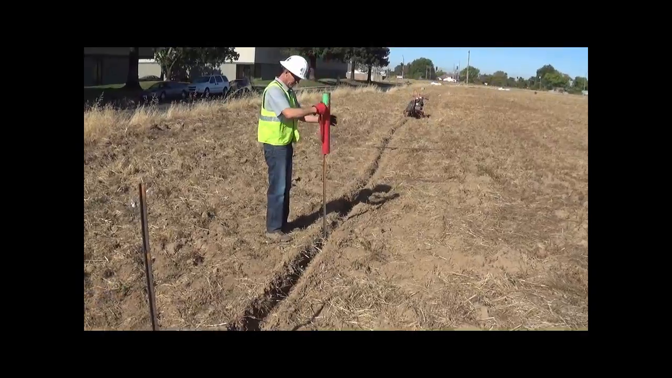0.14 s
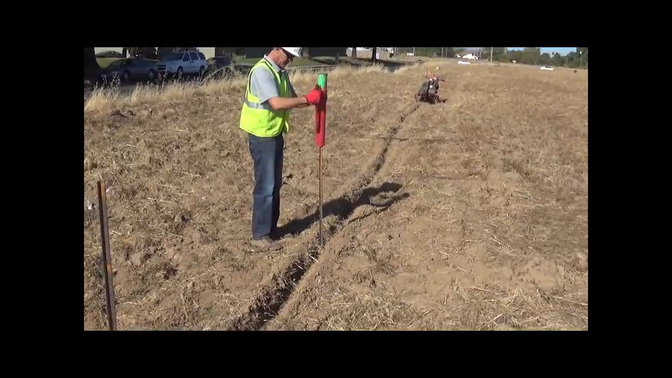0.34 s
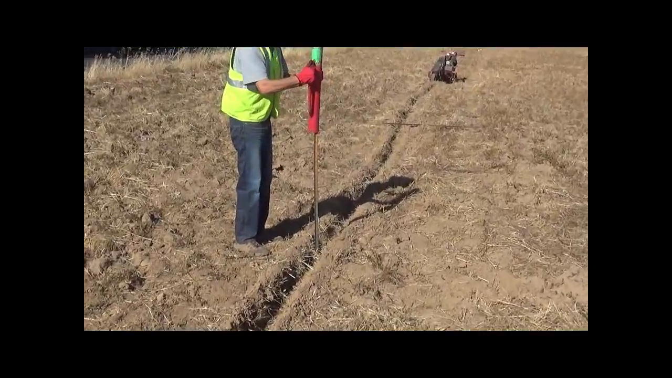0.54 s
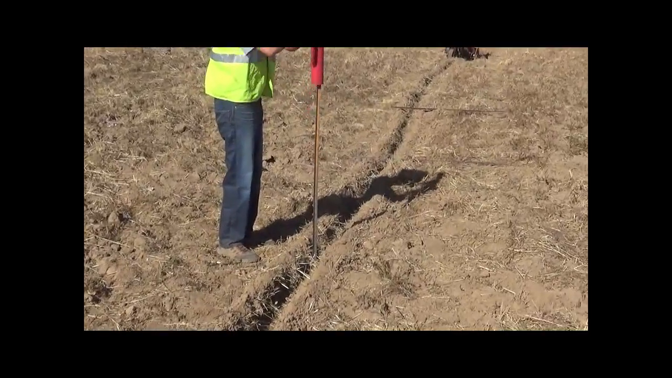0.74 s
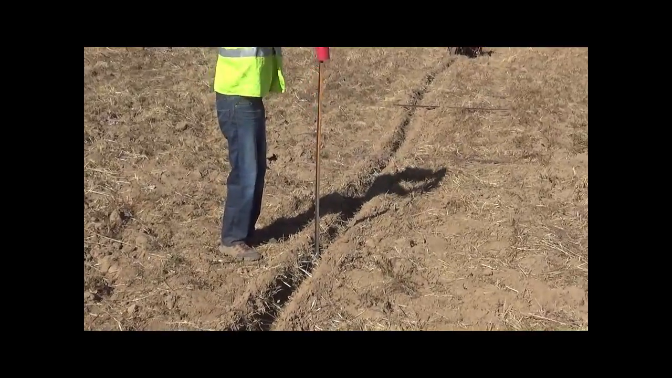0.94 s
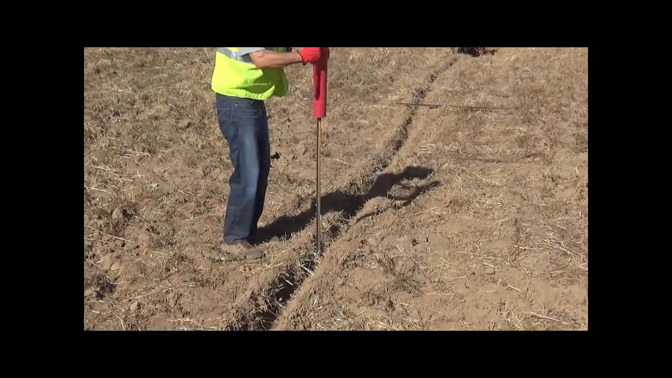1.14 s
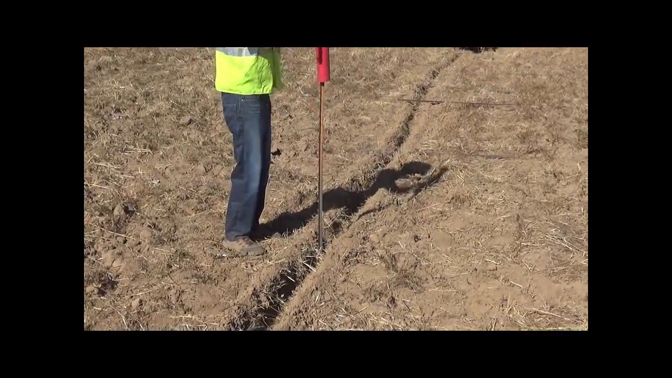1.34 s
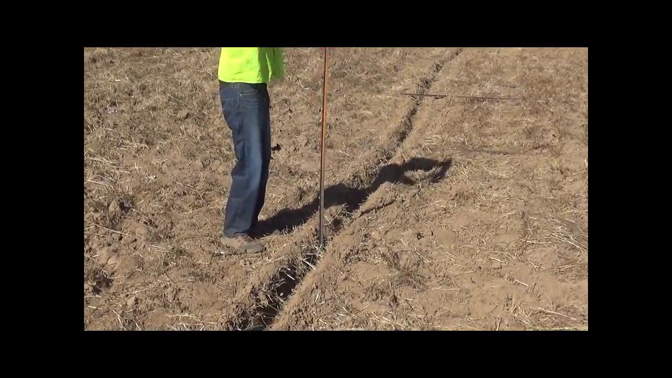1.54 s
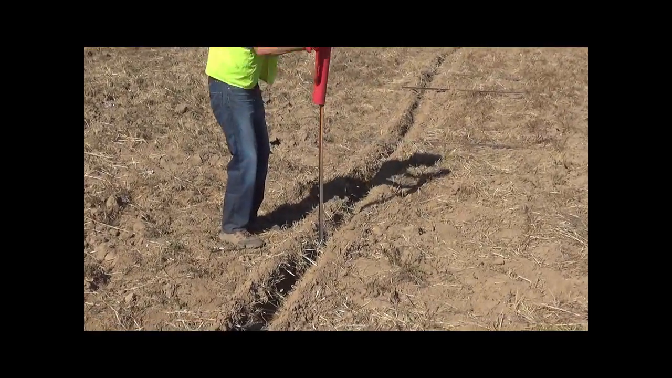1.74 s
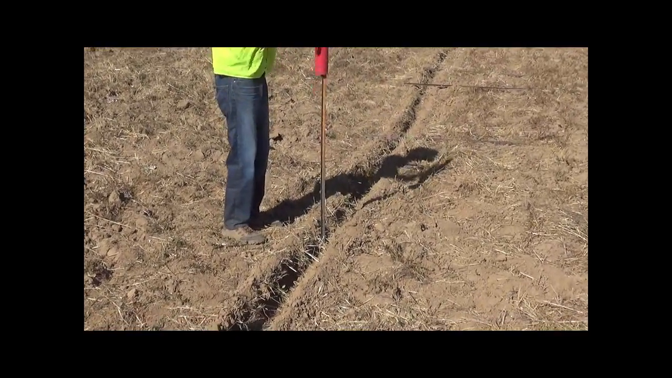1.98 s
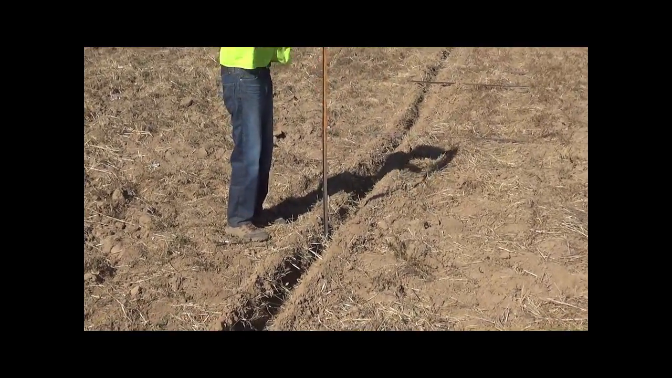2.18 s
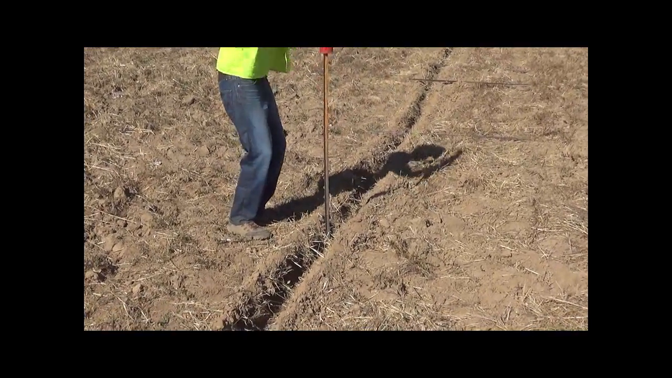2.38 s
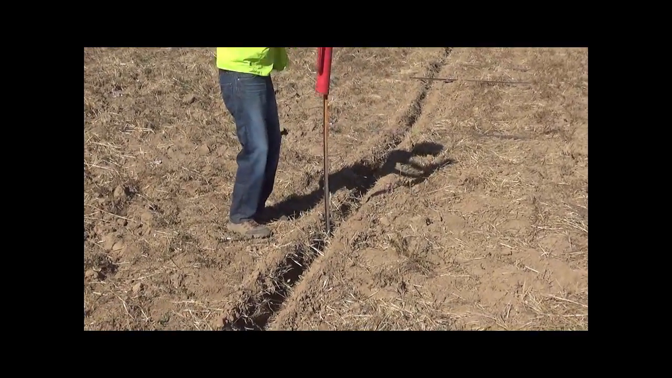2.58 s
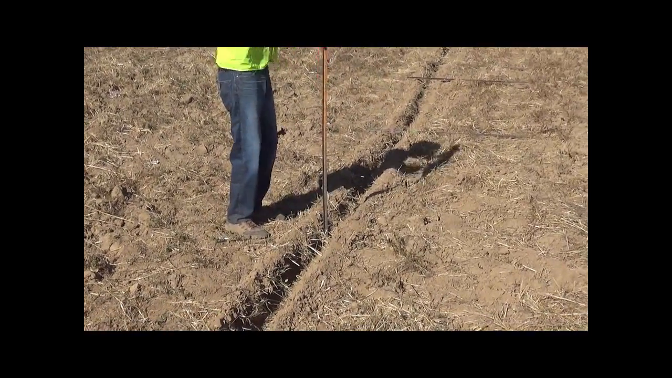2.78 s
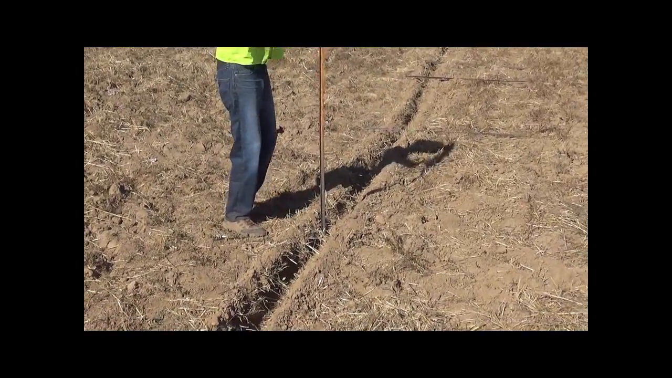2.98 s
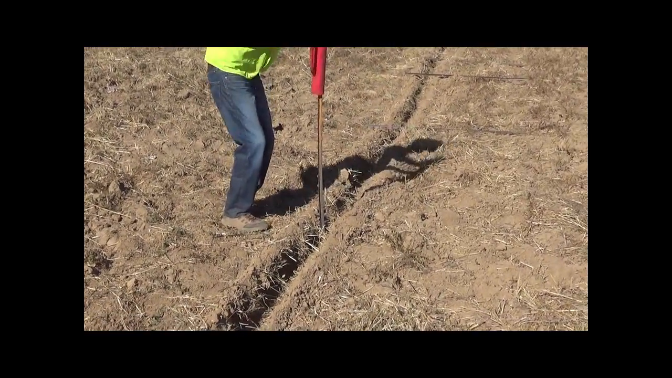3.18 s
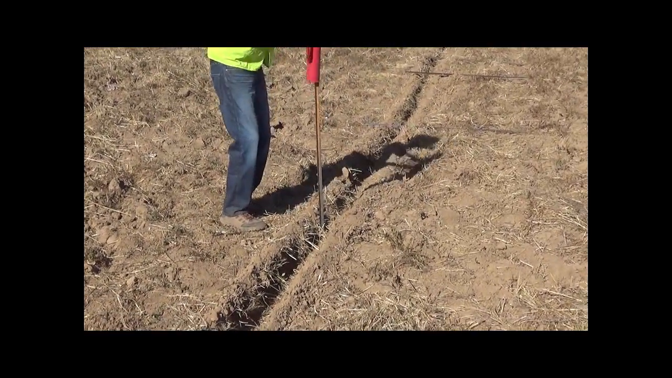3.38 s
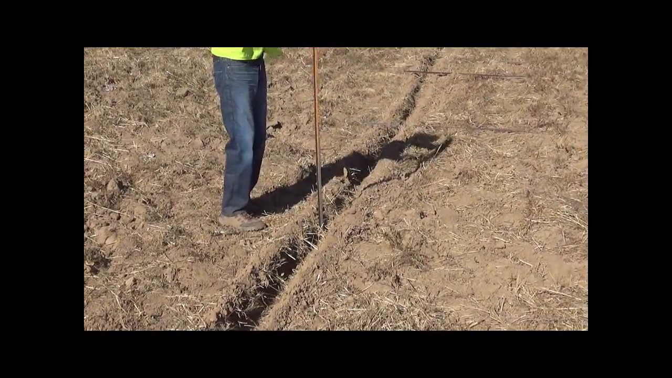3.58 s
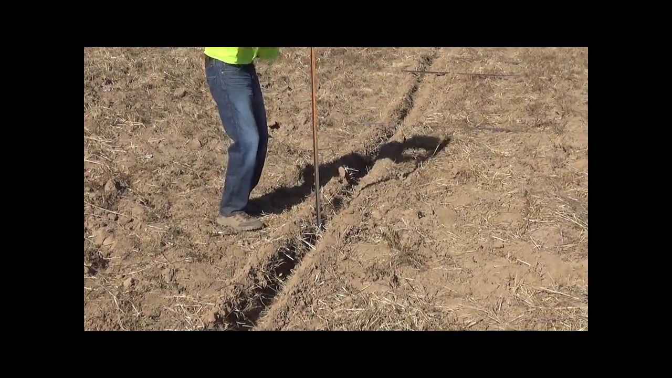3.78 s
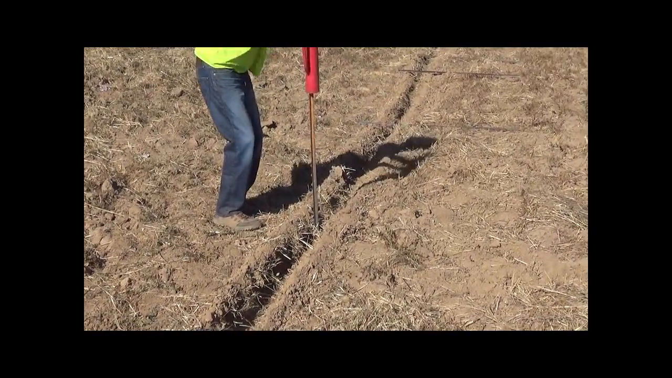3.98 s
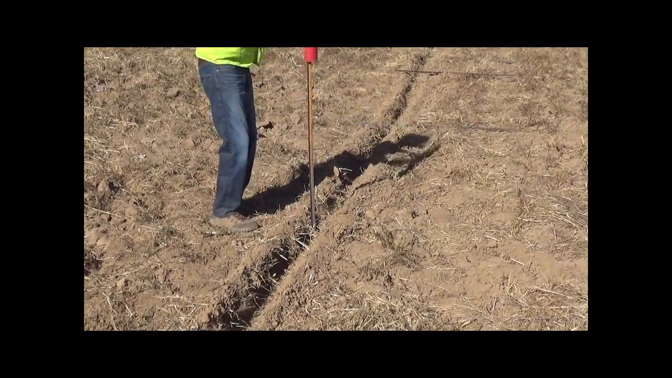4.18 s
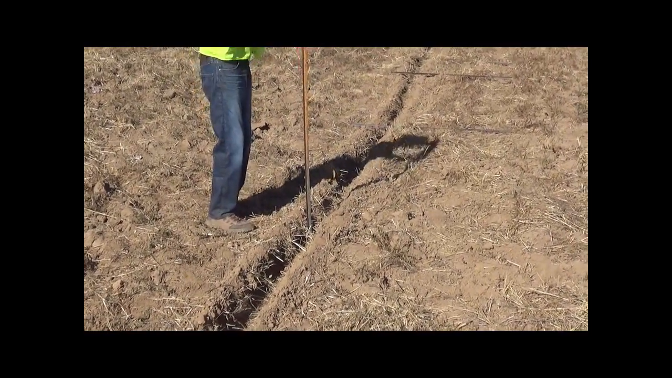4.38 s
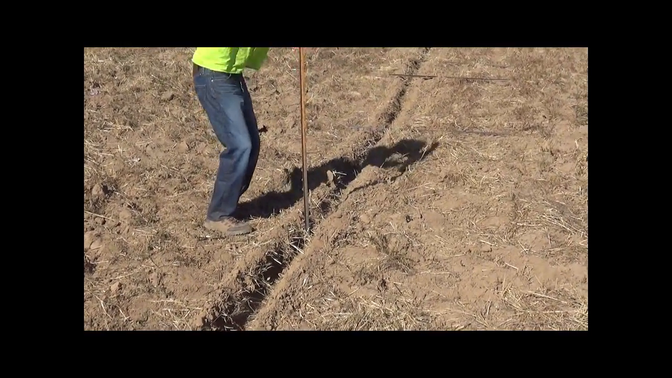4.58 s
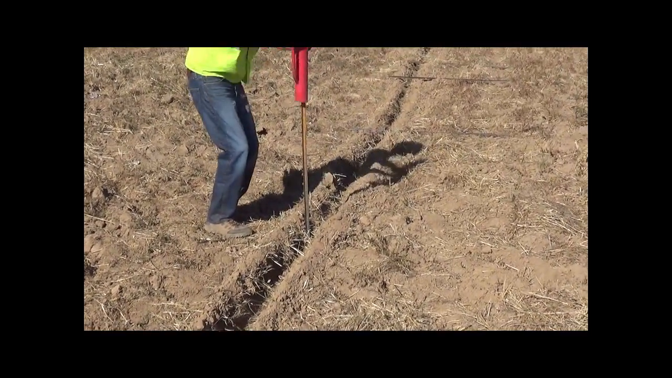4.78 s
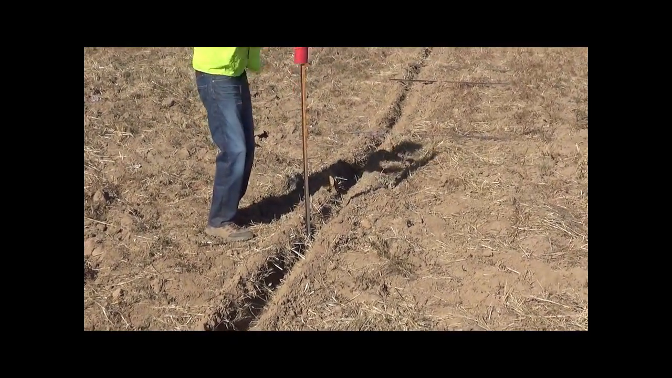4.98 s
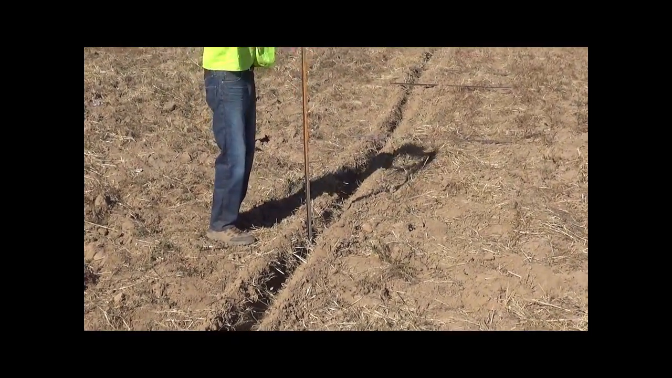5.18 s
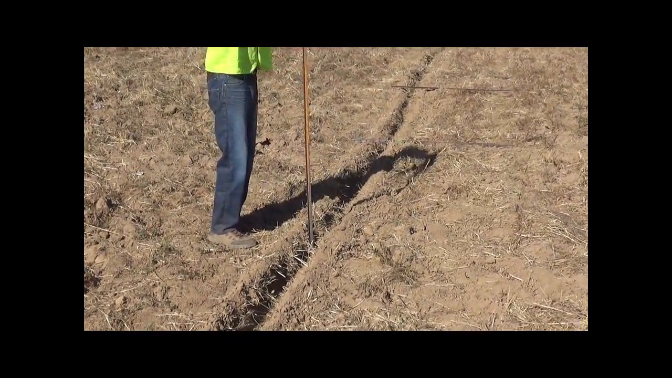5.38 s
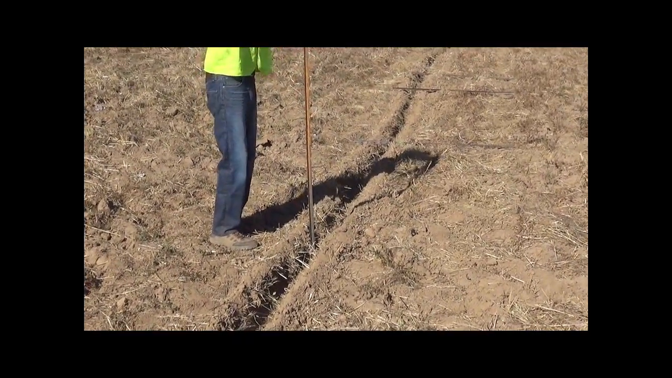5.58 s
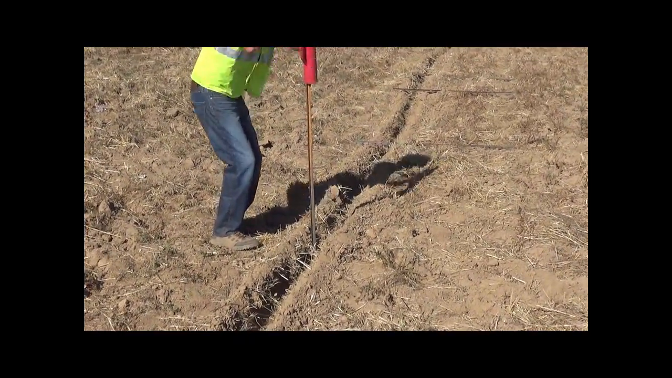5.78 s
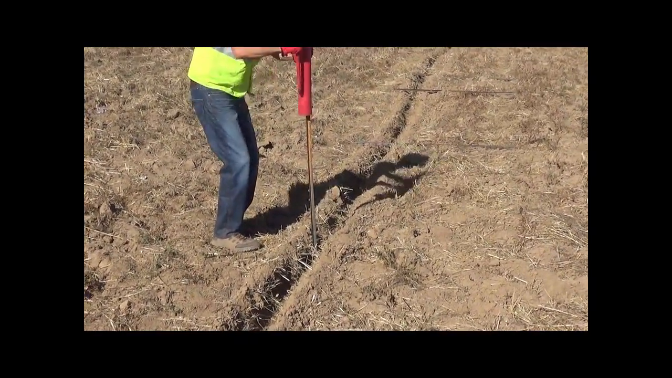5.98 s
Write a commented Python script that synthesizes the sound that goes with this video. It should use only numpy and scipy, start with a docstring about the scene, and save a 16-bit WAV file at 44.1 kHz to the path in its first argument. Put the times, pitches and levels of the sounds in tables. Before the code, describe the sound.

A steel post is driven into dry ground with a heavy capped tube, heard from a few metres away outdoors. At 0 seconds loose steel clanks and rings with the first blow, followed by scattered knocks and a dry tick near 0.5. The loudest blow lands at about 1.2, with a dense jangling chatter until 1.5. Further blows fall at about 1.8, 2.5, 3.3, 4.0 and 4.8, then, after a quieter gap, at 5.9. Each is a hard, bright, gritty clang with a hollow low boom and a ring gone within a few tenths of a second; the tube wall catches the post just before and rattles after. Low wind buffets the microphone until about 1.8, then mostly fades. Tiny falling chirps come near 1.1, 2.2 and 2.9. Faint traffic wash and a wavering low engine drone, slightly stronger around 5, lie underneath, with a faint open-air echo.

```python
"""A tube driver slams its cap onto a steel post in dry ground: eight blows, most of them about 0.7 s apart.
Each blow rings post, tube and trapped air as decaying modes; between blows the tube wall clanks on the post.
A faint diffuse tail follows the steel, with a few ticks and falling chirps.
Banded noise makes the wind, which buffets the microphone and mostly dies down, and the far traffic under a
wavering engine drone. The recorder's limiter ducks under the loud clanks."""
import sys
import numpy as np
from scipy import signal
from scipy.io import wavfile
from scipy.ndimage import uniform_filter1d, minimum_filter1d

SR = 44100
rng = np.random.default_rng(int(sys.argv[2]) if len(sys.argv) > 2 else 0)


def generate_wav(signal):
    """Clip the signal to [-1, 1] and save it as 16-bit WAV at the path in sys.argv[1]."""
    frames = np.transpose(np.atleast_2d(signal))
    scaled = np.clip(frames, -1, 1) * 32767
    pcm = np.round(scaled).astype(np.int16)
    wavfile.write(sys.argv[1], SR, pcm)


N = 265923
TIME = np.arange(N) / SR


def from_db(db):
    """Decibels to amplitude factor."""
    return 10 ** (np.asarray(db) / 20)


def rms_one(x):
    """Scale to an rms of 1."""
    return x / np.sqrt(np.mean(x ** 2) + 1e-20)


def in_time(rows):
    """Straight lines between (start_s, value) points, at every sample."""
    return np.interp(TIME, *np.transpose(rows))


def at_hz(points, hz):
    """Read a curve of (pitch_hz, value) points along a logarithmic pitch axis."""
    points = np.array(points)
    return np.interp(np.log(hz), np.log(points[:, 0]), points[:, 1])


def drift(rate_hz):
    """Random wandering of rms 1, smoothed by two equal poles at rate_hz."""
    step = 40   # samples between the points that are drawn
    pole = np.exp(-2 * np.pi * rate_hz * step / SR)
    chance = rng.standard_normal(N // step + 2002)
    slow = signal.lfilter([1], [1, -2 * pole, pole * pole], chance)[2000:]   # skip the run-in
    return np.interp(np.arange(N) / step, np.arange(len(slow)), rms_one(slow))


def banded_noise(spectrum, likeness, patchy_db, count):
    """Half-octave bands of stereo noise, each with its own level, flicker and left-right likeness; rms 1."""
    out = 0
    edges = 22 * 2 ** (np.arange(count + 1) / 2)
    white = rng.standard_normal((2, 2, N))
    for k, (low, high) in enumerate(zip(edges, edges[1:])):
        band = signal.butter(2, [low, high], "band", fs=SR, output="sos")
        mid, side = signal.sosfilt(band, white[k % 2])   # neighbouring bands use separate noise
        hz = np.sqrt(low * high)
        alike = np.clip(at_hz(likeness, hz), -1, 1)
        gain = from_db(at_hz(spectrum, hz) + patchy_db * drift(9.9))
        stereo = np.sqrt(1 + alike) * mid + np.sqrt(1 - alike) * side * [[1], [-1]]
        out = out + gain * stereo
    return rms_one(out)


# nominal decay of the steel's weaker modes, before each strike's damping: pitch_hz [Hz], t60_s [s]
STEEL_DECAY = [(700, 0.13), (2000, 0.14), (4000, 0.22), (6000, 0.29), (10000, 0.35), (15500, 0.29)]


def dense_modes(spectrum, count):
    """Closely, unevenly spaced modes of uneven strength under a spectrum: rows pitch_hz, level_db, t60_s."""
    spacing_hz = 15200 / count
    hz = 600 + spacing_hz * (np.arange(count) + rng.random(count))
    t60 = at_hz(STEEL_DECAY, hz) * from_db(0.14 * rng.standard_normal(count))
    # every four neighbours hold two weak modes, one middling and one strong
    fours = rng.permuted(np.tile([-1, -1, 0, 1], (count // 4, 1)), axis=1)
    uneven_db = 7 * (fours.ravel() - 0.3)
    level_db = at_hz(spectrum, hz) + 10 * np.log10(spacing_hz / 100) + uneven_db
    return np.column_stack([hz, level_db, t60])


HOOP_HZ, HOOP_WIDTH_OCTAVES = 1777, 0.23   # lowest hoop mode; width of the boost around each one


def contact_colour(hz, tilt, hoop_db):
    """A hard contact tilts the ring to the treble; a square one favours hoop flexing in 2, 3 or 4 lobes: dB."""
    lobes = np.arange(2, 5)[:, None]
    ratios = lobes * (lobes ** 2 - 1) / np.sqrt(lobes ** 2 + 1)   # pitches of a flexing ring
    octaves_off = np.log2(hz / (HOOP_HZ * ratios / ratios[0]))
    nearness = np.exp(-0.5 * (octaves_off / HOOP_WIDTH_OCTAVES) ** 2).sum(axis=0)
    return tilt * np.log2(np.maximum(hz, 1500) / 4000) + hoop_db * nearness


# stereo balance of the ringing steel and air: pitch_hz [Hz], left_minus_right_db [dB]
RING_BALANCE = [(300, -1), (1400, 3), (2800, 1), (5000, 1.75), (10000, 0.3), (15000, -3)]


def strike(hits, modes, vary_db, spread_db, size, damping=1.0, swell_s=0.0024, favour_db=0):
    """Each contact falls on another spot and favours other modes, which ring for `size` samples."""
    hits, (hz, mode_db, t60) = np.array(hits), np.transpose(modes)
    chance = rng.standard_normal((len(hits), len(hz), 3))
    colour_db = contact_colour(hz, tilt=hits[:, 2:3], hoop_db=hits[:, 3:4]) + favour_db
    # modes with a node near the spot of contact stay quiet: a comb whose teeth move from hit to hit
    spot = rng.random((len(hits), 2))
    comb = np.cos(2 * np.pi * (hz * (0.7 + spot[:, :1]) / 1000 + spot[:, 1:]))
    chance_db = vary_db * (chance[..., 0] / 2 + 2 * comb - 1.5)
    height = np.sqrt(2) * from_db(hits[:, 1:2] + colour_db + mode_db + chance_db)
    phase = np.arctan2(chance[..., 1], chance[..., 2])
    weights = np.hstack([height * np.cos(phase), height * np.sin(phase)])
    t = TIME[:size].astype(np.float32)
    turn = np.outer(np.float32(2 * np.pi * hz), t)
    fade = np.exp(-np.minimum(np.outer(np.float32(damping * np.log(1000) / t60), t), 20))
    fade *= 1 - np.exp(-t / np.float32(swell_s))   # the ring builds up as the shock runs along the steel
    rings = np.vstack([fade * np.sin(turn), fade * np.cos(turn)])
    # every mode radiates in its own pattern and so leans a little to one side
    lean_db = at_hz(RING_BALANCE, hz) + spread_db * rng.standard_normal(len(hz))
    half_lean_db = np.tile(lean_db, 2) / 2   # once for the sines, once for the cosines
    out = np.zeros((2, N + size))
    for channel, sign in zip(out, (1, -1)):
        clanks = np.float32(weights * from_db(sign * half_lean_db)) @ rings
        for s, clank in zip(hits[:, 0], clanks):
            start = max(round(s * SR), 0)
            channel[start:start + size] += clank
    return out[:, :N]


def crash(hits, spectrum, t60, grit_db):
    """A gritty burst of shaped noise at each contact, its power decaying quickly."""
    kicks = np.zeros(N)
    for s, level_db, *_ in hits:
        kicks[max(round(s * SR), 0)] += from_db(level_db) ** 2
    decay = from_db(-60 / (t60 * SR)) ** 2
    power = signal.lfilter([1], [1, -decay], kicks + 1e-18)
    hz = np.linspace(0, SR / 2, 257)
    shape = signal.firwin2(511, hz, from_db(at_hz(spectrum, hz + 1)), fs=SR)
    hiss = signal.fftconvolve(rng.standard_normal(N), shape, "same")
    return np.sqrt(power) * rms_one(from_db(grit_db * drift(150)) * hiss)


def rattle(hits, count, delay_s, first_db):
    """After each contact the post whips about in the tube and touches it again at random moments."""
    rows = np.repeat(np.array(hits, float), count, axis=0)
    chance = rng.random((len(rows), 2))
    rows[:, 0] += delay_s * chance[:, 0]
    rows[:, 1] += first_db - 8 * chance[:, 1] - 5 * chance[:, 0]   # later touches tend to be weaker
    return rows


# the cap lands on the post: start_s [s], level_db [dB, relative], tilt [dB per octave], hoop_db [dB],
# lead_s [s by which the wall catches the post earlier], sing_hz [Hz that sings at this catch]
STROKES = [(0.07, -2, -2, 3, 0.042, 9383), (1.185, 7.5, 1.5, -2.5, 0.021, 4748),
           (1.839, -12, 1.5, -4.5, 0.0043, 10053), (2.549, -5, -.5, 0, .050, 1614),
           (3.292, -4, 1.6, -3, .012, 2767), (4.012, -8, -0.5, 3, 0.054, 1951),
           (4.78, -6, -2, -3.5, 0.057, 5030), (5.935, -7, 0.5, -3.5, 0.039, 1951)]
GRAZE_S, GRAZE_DB = 0.13, -41   # a light graze as the downswing begins: lead before the blow, relative level
CATCH_BELOW_DB, CATCH_TILT, CATCH_HOOP_DB = 5.5, 0.78, 5.5   # dB under the blow, dB per octave, dB


def downswings():
    """On its way down the tube grazes the post, then catches it and briefly chatters: rows like KNOCKS."""
    grazes = [(s - GRAZE_S, GRAZE_DB, 0, 0, hz) for s, *_, hz in STROKES]
    catches = [(s - lead_s, level_db - CATCH_BELOW_DB, CATCH_TILT, CATCH_HOOP_DB, hz)
               for s, level_db, _, _, lead_s, hz in STROKES]
    return np.vstack([grazes, catches, rattle(catches, count=2, delay_s=0.025, first_db=-3.0)])


# the tube wall knocks on the post as it rebounds and is lifted: start_s [s], level_db [dB, relative],
# tilt [dB per octave], hoop_db [dB], sing_hz [Hz that sings]
KNOCKS = [(0.0, 1.5, 2, 1, 1738), (0.156, -3.5, -1, 7, 3482), (0.224, -8, 5, 0, 1738),
          (0.408, -14, 4, -5.5, 10530), (0.632, -28, -2.5, 2, 4882), (0.736, -25.5, -1.5, 3, 4748),
          (0.849, -23, 1, 3, 1738), (0.862, -23.5, 4.5, 5.5, 4720), (0.935, -9, 0.5, -3, 1951),
          (1.241, 3, 0, 5, 4800), (1.289, -0.5, 3.5, 8, 1951), (1.319, 2.5, 3, 4.5, 4700),
          (1.338, -0.5, 0.5, 4, 9383), (1.444, -0.5, 3, -2, 2072), (1.526, -19, 0, 5, 2072),
          (1.567, -12, -0.5, -11.5, 1738), (1.893, -10.5, 2.5, 6.5, 1614), (1.945, -16, 2, 12.5, 1951),
          (1.966, -6.5, 2, 1.5, 4780), (2.041, -17.5, -0.5, -1, 4980), (2.318, -25.5, -4.5, -5, 4780),
          (2.612, -8, 2.5, 2, 4930), (2.689, -8, 0, 1.5, 4808), (2.75, -25, -5.5, 6, 1738),
          (2.934, -26, -6.5, 0, 2326), (3.055, -23.5, -0.5, 0.5, 2767), (3.345, -13, 0, 8, 4760),
          (3.366, -8.5, -2, -10, 1738), (3.391, -6, 1.5, 6, 4686), (3.439, -8, -0.5, -8, 3482),
          (3.627, -18, 1, -1, 2072), (4.088, -11.5, 0, -4.5, 1951), (4.152, -2.5, 2, -2, 4720),
          (4.251, -11.5, -1.5, 8.5, 1738), (4.354, -22.5, 5, -19, 2767), (4.575, -32, -1, 2.5, 9020),
          (4.878, -15, 1, 4.5, 9383), (4.925, -9, 2.5, -5.5, 2072), (5.104, -26.5, -0.5, -1.5, 3482),
          (5.22, -22, -3, -1, 2072), (5.316, -35.5, -2.5, 5, 1738), (5.858, -23, 1, 1.5, 9800),
          (5.883, -18, 7.5, -3, 10000)]
# ringing of the driver tube: pitch_hz [Hz], level_db [dB, relative], t60_s [s, before damping]
TUBE_MODES = [(1075.0, -17.0, 0.33), (1251.0, -22.0, 0.26), (1480.0, -22.0, 0.41), (1614.0, -14.0, 0.35),
              (1738.0, -13.0, 0.61), (1795.0, -26.0, 0.37), (1951.0, -15.0, 0.43), (2072.0, -14.0, 0.53),
              (2326.0, -18.0, 0.39), (2497.0, -33.0, 0.97), (2627.0, -23.0, 0.52), (2767.0, -16.0, 0.47),
              (3482.0, -17.0, 0.31), (3902.0, -39.0, 0.92), (4748.0, -13.0, 0.45), (4804.0, -10.0, 0.28),
              (4882.0, -12.0, 0.29), (5068.0, -19.0, 0.49), (5248.0, -21.0, 0.34), (5733.0, -26.0, 0.38),
              (6045.0, -23.0, 0.43), (7253.0, -23.0, 0.3), (8895.0, -21.0, 0.41), (9020.0, -16.0, 0.25),
              (9383.0, -17.0, 0.36), (9434.0, -19.0, 0.31), (9867.0, -21.0, 0.31), (10053.0, -17.0, 0.35),
              (10530.0, -31.0, 0.33), (14314.0, -35.0, 0.46)]
# the tube's many weaker modes: pitch_hz [Hz], level_db [dB per 100 Hz, relative]
TUBE_DENSE = [(700.0, -33), (1050.0, -14.5), (1350.0, -26.5), (1700.0, -15.5), (2600.0, -16),
              (3200.0, -19.5), (4400.0, -26), (4900.0, -23), (5500.0, -24), (8000.0, -30.5), (9400.0, -25),
              (10500.0, -24), (11500.0, -37.5), (15500.0, -47.5)]
# the driver drops on the still loose post: start_s [s], level_db [dB, relative], tilt [dB per octave],
# hoop_db [dB]
FREE_HITS = [(0.0, -3.5, 3, 5.5), (0.069, 0.5, 1, 3)]
# the post rings freely while the driver is still being slid on: pitch_hz [Hz], level_db [dB, relative],
# t60_s [s]
FREE_POST = [(769, -25.5, 1.33), (1068, -15, 0.48), (1766, -14.5, 0.43), (2340, -15.5, 0.5)]
SING_DB, SING_WIDTH = 12, 0.0075   # each spot of contact makes the modes at one pitch sing; relative width


def knocks():
    """The loose tube clanks against the post, chatters and rings: clear modes, dense modes and noise."""
    hits = np.vstack([KNOCKS, downswings()])
    pitch_off = np.log(np.array(TUBE_MODES)[:, 0] / hits[:, 4:])
    sung = np.exp(-0.5 * (pitch_off / SING_WIDTH) ** 2)
    tones = strike(hits, TUBE_MODES, vary_db=3.0, spread_db=1.5, size=44100, damping=0.99,
                   favour_db=SING_DB * sung)
    weak_modes = dense_modes(TUBE_DENSE, count=400)
    clang = strike(hits, weak_modes, vary_db=4.5, spread_db=-1.5, size=16000, damping=1.24)
    free = strike(FREE_HITS, FREE_POST, vary_db=-2.0, spread_db=3.5, size=50000)
    noise = crash(hits, TUBE_DENSE, t60=0.13, grit_db=1.5)
    return from_db(-4.5) * tones + from_db(-0.28) * clang + free + from_db(-11.5) * noise


# wind spectrum: pitch_hz [Hz], level_db [dB per Hz, relative]
WIND = [(15, -36), (25, -12.5), (91, 0.5), (220, 0), (260, -5), (370, 0), (438, -11.5), (934, -24),
        (1140, -28.5), (1400, -33.5), (1820, -31), (3080, -120)]
# wind likeness of the two sides: pitch_hz [Hz], correlation [-1 to 1]
WIND_LIKENESS = [(30, .75), (70, 0.7), (140, 0.76), (280, 0.15), (1000, -0.38)]
# strength of the dying breeze at the microphone: start_s [s], level_db [dB, relative]
BREEZE = [(0.0, -12.5), (0.3, -16.5), (1.02, -13), (1.15, -22.5), (1.55, -13.5), (1.85, -38.5), (2.6, -37),
          (3.2, -40), (4.2, -42), (4.45, -62.5), (6.03, -47.5)]
# short puffs on top of the breeze: peak_s [s], level_db [dB, relative]
PUFFS = [(0.028, -7.5), (1.382, -11), (1.761, -25.5), (2.088, -23.5), (2.339, -36), (2.63, -26.5),
         (3.35, -35), (3.59, -35.5), (3.771, -37)]
PUFF_S = 0.025   # a puff swells and fades within about this time either side of its peak


def wind():
    """Lumpy turbulence on the microphone ports, a breeze with puffs; weak air makes only large, slow eddies."""
    puffs = 0
    for s, peak_db in PUFFS:
        puffs = puffs + from_db(peak_db) * np.exp(-np.minimum(((TIME - s) / PUFF_S) ** 2, 20))
    gust_db = 20 * np.log10(from_db(in_time(BREEZE)) + puffs) + 2.11 * drift(31.0)
    eddies = banded_noise(WIND, WIND_LIKENESS, patchy_db=2.0, count=13)
    slow = signal.sosfilt(signal.butter(1, 200, fs=SR, output="sos"), eddies)
    brisk = np.clip((gust_db + 35) / 22, 0, 1)   # share of small, fast eddies
    return from_db(gust_db - 0.5) * (slow + brisk * (eddies - slow))


# far traffic spectrum: pitch_hz [Hz], level_db [dB per Hz, relative]
TRAFFIC = [(30, -6.5), (65, 1), (130, -4.5), (250, -15), (500, -10.5), (1000, -17.5), (2000, -14),
           (4000, -30), (8000, -35.5), (15000, -44)]
# traffic likeness of the two sides: pitch_hz [Hz], correlation [-1 to 1]
TRAFFIC_LIKENESS = [(60, 1), (500, 0.96), (2000, 0.66), (10000, 0.97)]
# drone of a far engine: start_s [s], level_db [dB rms]
ENGINE = [(0, -47), (4.3, -47), (4.6, -57), (5.0, -41.5), (5.4, -43), (5.8, -51), (6.03, -47)]


def traffic():
    """A soft noise wash of far traffic with one engine's drone, a sine of wavering pitch."""
    engine_hz = 65 + 1.05 * drift(2.5)
    hum = rms_one(np.sin(2 * np.pi * np.cumsum(engine_hz) / SR))
    wash = banded_noise(TRAFFIC, TRAFFIC_LIKENESS, patchy_db=3.1, count=19)
    return from_db(in_time(ENGINE)) * hum + from_db(-43.5) * wash


def field_echo(x, t60, dull_hz):
    """Rough ground, trees and far walls scatter back a dull tail: convolution with decaying noise."""
    t = TIME[:SR]
    tail = rng.standard_normal((2, SR)) * from_db(-60 * t / t60) * (1 - np.exp(-t / 0.02))
    tail = signal.sosfilt(signal.butter(1, min(dull_hz, SR / 3), fs=SR, output="sos"), tail)
    tail /= np.sqrt(np.sum(tail ** 2) / 2)   # mean energy of 1 a side
    return signal.fftconvolve(x, tail, axes=1)[:, :N]


# ringing of post and tube after a blow: pitch_hz [Hz], level_db [dB, relative], t60_s [s, before damping]
POST_MODES = [(1058.0, -14.0, 0.2), (1612.0, -15.0, 0.3), (2379.0, -10.0, 0.22), (2440.0, -11.0, 0.17),
              (2613.0, -20.0, 0.17), (2755.0, -11.0, 0.24), (3902.0, -15.0, 0.15), (4735.0, -23.0, 0.18),
              (4879.0, -21.0, 0.18), (5606.0, -24.0, 0.17), (5881.0, -16.0, 0.24), (6023.0, -12.0, 0.28),
              (6287.0, -16.0, 0.45), (7302.0, -14.0, 0.21), (8677.0, -21.0, 0.18), (9372.0, -23.0, 0.17),
              (9628.0, -22.0, 0.17), (10040.0, -22.0, 0.17), (10395.0, -22.0, 0.17), (10770.0, -23.0, 0.18)]
# the many weaker modes after a blow: pitch_hz [Hz], level_db [dB per 100 Hz, relative]
POST_DENSE = [(700.0, -37.5), (1050.0, -19.5), (1350.0, -34.5), (1700.0, -17.5), (2600.0, -13.5),
              (3200.0, -23.5), (4400.0, -25.5), (4900.0, -12.5), (5500.0, -23.5), (8000.0, -36.5),
              (9400.0, -12.5), (10500.0, -21.5), (11500.0, -29), (15500.0, -41.5)]
# odd harmonics, roughly, of the air column in the capped tube: pitch_hz [Hz], level_db [dB, relative],
# t60_s [s]
AIR_MODES = [(159.5, -20.5, 0.47), (464, -15, 0.25), (728, -31, 0.17)]
AIR_FOLLOWS = 0.9   # each blow pumps the air in the tube: dB of boom per dB of blow


def blows():
    """The cap hits the post head: post, tube and the air inside it ring together while the steel rattles."""
    hits = np.array(STROKES)[:, :4]
    tones = strike(hits, POST_MODES, vary_db=4.9, spread_db=4.0, size=22000, damping=0.89)
    pumps = [(s, AIR_FOLLOWS * level_db, 0, 0) for s, level_db, *_ in STROKES]
    air = strike(pumps, AIR_MODES, vary_db=0.6, spread_db=1.0, size=22000, swell_s=0.041)
    contacts = np.vstack([hits, rattle(hits, count=6, delay_s=0.04, first_db=2.5)])
    weak_modes = dense_modes(POST_DENSE, count=400)
    clang = strike(contacts, weak_modes, vary_db=5.0, spread_db=0.5, size=14000, damping=1.33)
    noise = crash(contacts, POST_DENSE, t60=0.063, grit_db=5.0)
    return from_db(0.5) * tones + from_db(0.35) * air + from_db(-0.5) * clang + from_db(-13) * noise


# dry ticks close to the microphone: start_s [s], level_db [dB]
TICKS = [(.516, -46), (.522, -23.5), (.645, -34), (.785, -45)]
# faint chirps: peak_s [s], pitch_hz [Hz at the peak], glide [Hz per s], level_db [dB peak]
CHIRPS = [(1.101, 2800, -2500, -36), (2.19, 2680, -1000, -33.5), (2.897, 2660, -1000, -38)]


def small_sounds():
    """A few dry ticks of decaying noise and short falling chirps, sines under a bell-shaped swell."""
    tick_spectrum = [(500, 13), (3000, -7), (10000, 1), (15000, -9)]   # pitch_hz, level_db
    out = crash(TICKS, tick_spectrum, t60=0.12, grit_db=-1.0)
    for s, hz, glide, level_db in CHIRPS:
        t = TIME - s
        swell = np.exp(-np.minimum((t / 0.01) ** 2, 20))
        out = out + from_db(level_db) * swell * np.sin(2 * np.pi * (hz + glide * t / 2) * t)
    return out


def scene():
    """The steel and its echo, with small sounds, wind and traffic."""
    steel = knocks() + blows()
    echo = from_db(-27.5) * field_echo(steel, t60=0.74, dull_hz=2000)
    return steel + echo + small_sounds() + wind() + traffic()


def limiter(x, ceiling_db, release_db_per_s):
    """The gain drops just ahead of a loud sound and creeps back at a steady rate in dB."""
    power = uniform_filter1d(np.mean(x ** 2, axis=0), size=130)
    over_db = np.maximum(10 * np.log10(np.maximum(power, 1e-12)) - ceiling_db, 0)
    ramp_db = release_db_per_s * TIME
    cut_db = np.maximum.accumulate(over_db + ramp_db) - ramp_db
    early_db = minimum_filter1d(-cut_db, size=130)   # looks ahead
    return x * from_db(uniform_filter1d(early_db, size=80))


def record(dry):
    """A limiter holds the clanks down, peaks are rounded, then the top is cut."""
    held = limiter(dry, ceiling_db=-12.5, release_db_per_s=34)
    rounded = 0.9 * np.tanh(held / 0.9)
    top_cut = signal.ellip(10, 0.1, 80, 15800, fs=SR, output="sos")   # low-pass edge in Hz
    return signal.sosfilt(top_cut, rounded)


dry = scene()
out = record(dry)
generate_wav(out)
```